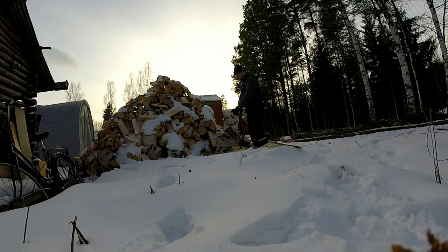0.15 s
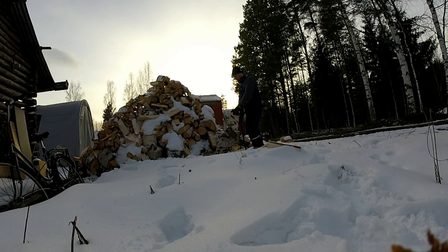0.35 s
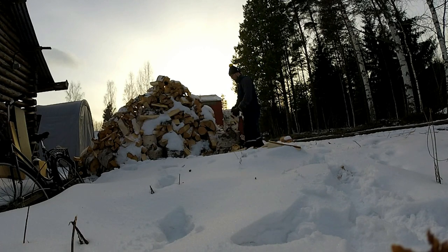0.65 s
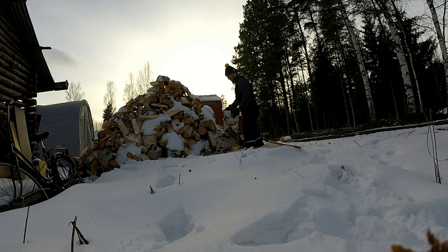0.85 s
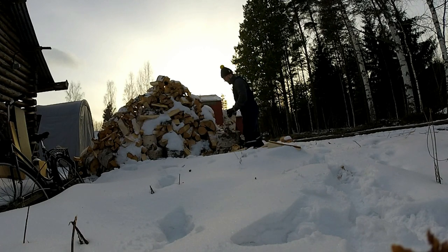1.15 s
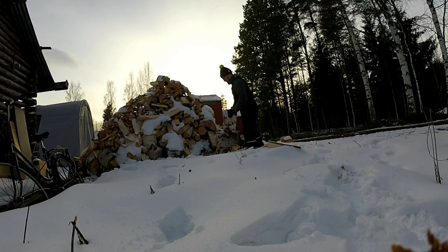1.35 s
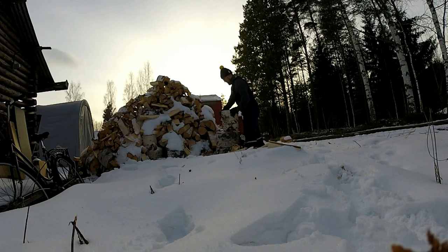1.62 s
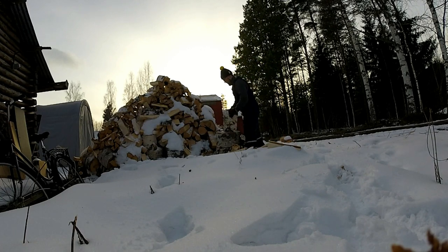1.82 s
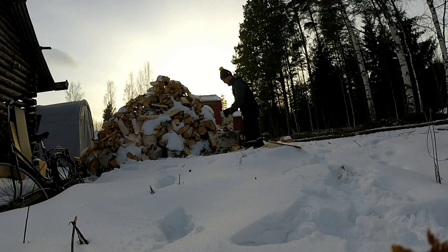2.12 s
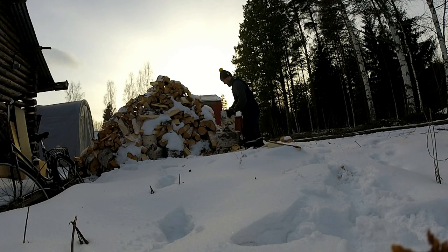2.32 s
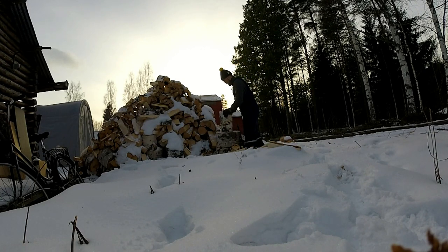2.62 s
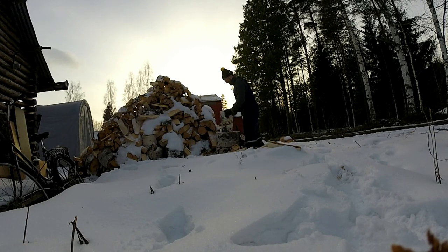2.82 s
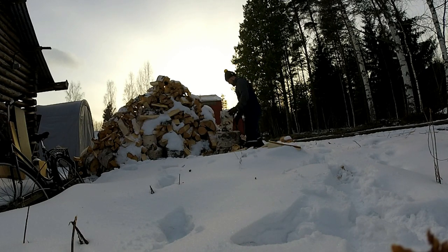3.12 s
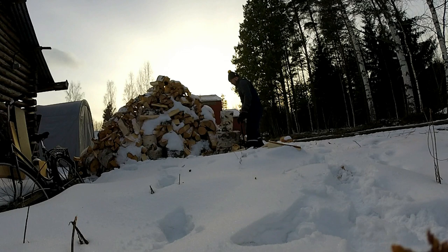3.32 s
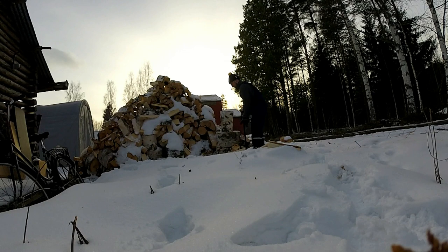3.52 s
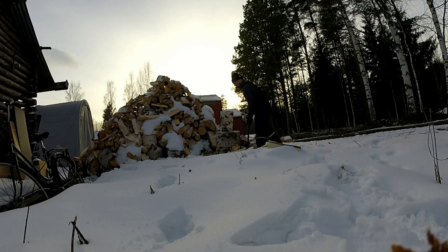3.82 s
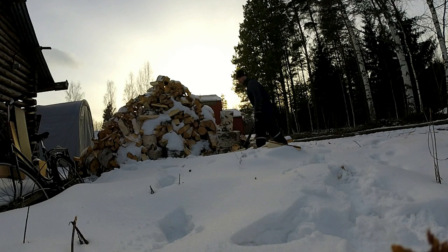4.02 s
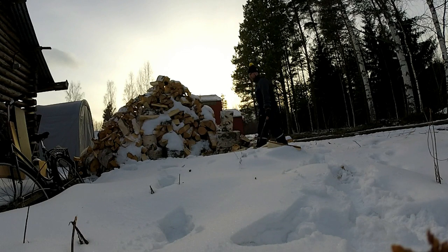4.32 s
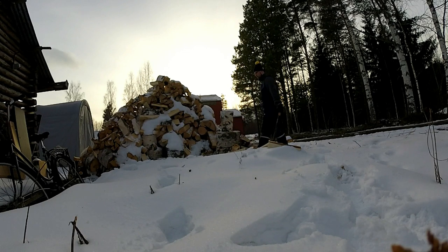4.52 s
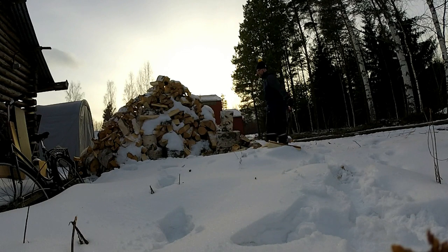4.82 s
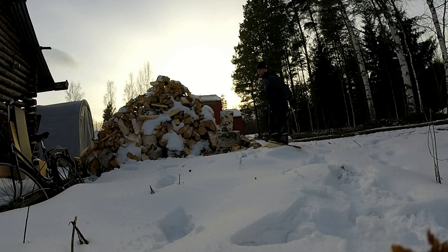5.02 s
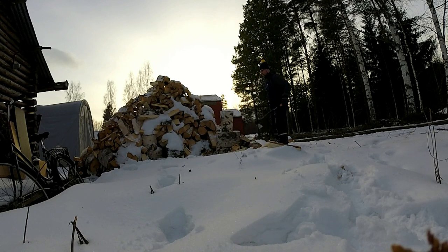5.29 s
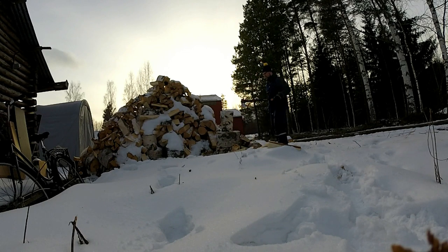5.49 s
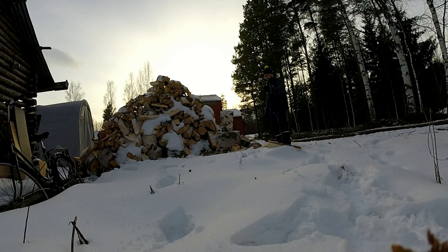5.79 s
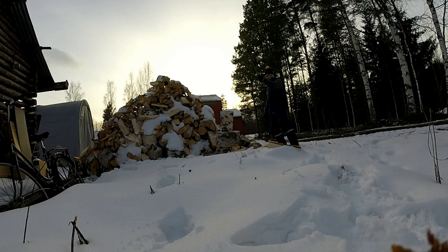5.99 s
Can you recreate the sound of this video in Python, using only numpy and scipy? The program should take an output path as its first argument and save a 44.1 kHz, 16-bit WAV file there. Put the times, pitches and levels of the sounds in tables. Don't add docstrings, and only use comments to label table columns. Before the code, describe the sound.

Outdoors in a quiet snowy yard, soft boot thuds and thin high bird whistles come first. Around 1.6 seconds an axe blow cracks a log sharply, with a brief tearing of grain, then a heavy low thud as wood lands. Smaller thumps and snow crunches follow. A nearby bird alternates clear whistles and buzzing notes, then distant trills and pips end it. A small microphone near the snow adds low hiss.

```python
import sys
import numpy as np
from scipy import signal
from scipy.fft import rfft, irfft
from scipy.io import wavfile
from scipy.ndimage import uniform_filter1d

SR = 44100
rng = np.random.default_rng(int(sys.argv[2]) if len(sys.argv) > 2 else 0)


def boost(x):
    u = np.asarray(x, float) / 20
    return 10 ** u


def transcribe(u):
    v = np.clip(np.atleast_2d(u).T, -1, 1)
    q = np.round(v * 32767).astype(np.int16)
    wavfile.write(sys.argv[1], SR, q)


N = 271215

# start_s, peak_db, pitch_hz, t60_s
SNAPS = [(1.6061, -28, 4990, 0.0113), (1.606, -23.5, 5530, 0.014), (1.606, -22.5, 3480, 0.017),
         (1.6065, -24, 2862, .018), (1.6072, -21, 2900, 0.003), (1.6081, -30, 2310, 0.0057),
         (1.606, -31, 7830, 0.0088), (1.6062, -33, 6890, 0.013), (1.6059, -33, 6130, .014),
         (1.6173, -27, 2600, 0.0052), (1.6225, -32, 3100, .005), (1.6592, -48, 2150, .015),
         (1.5786, -49, 1800, .012), (1.5789, -53, 900, .02)]
# pitch_hz, level_db, t60_s
LOG_MODES = [(134.3, -43.5, 0.13), (432, -25.5, 0.036), (1062, -23.5, 0.02), (510, -33, 0.025),
             (1350, -43, 0.017), (1629, -37, 0.035), (2075, -31, 0.05), (2413, -43, .05),
             (2600, -36, 0.045), (3500, -36.5, 0.028), (3795, -40, .03), (5270, -45.5, .04),
             (6218, -48, .05)]
BLOW_S, LOG_RISE_TURNS = 1.607, 0.6
# peak_s, level_db, swell_s, fade_s
TEARS = [
    (1.6062, -29, .0003, 0.0092),
    (1.6205, -38.5, 0.012, 0.006),
    (1.628, -50.5, .003, 0.017),
    (1.661, -60, .002, 0.022),
    (1.685, -58.5, 0.032, 0.017),
]
# freq_hz, level_db
TEAR_COLOUR = [(420, -6), (680, -24), (1700, -6), (3000, -7), (4600, -8.5), (6300, -9), (10000, -20),
               (15500, -46)]
# start_s, length_s, level_db, first_hz, last_hz
SQUEAKS = [
    (1.6156, 0.0086, -35, 2500, 3370),
    (1.617, .006, -47, 6120, 6250),
]

# start_s, peak_db, first_hz, t60_s
STAMPS = [(.226, -47.5, 58.1, 0.078), (0.437, -31.5, 71.4, 0.134), (.71, -51.5, 57.7, 0.16),
          (.83, -53.5, 50, 0.16), (1.28, -55.5, 72, 0.17), (1.42, -43.5, 74.6, 0.122),
          (1.833, -24.5, 62.4, 0.06), (1.865, -37.5, 100, 0.28), (2.019, -36.5, 66.7, 0.303),
          (2.88, -43, 91, 0.062), (4.529, -45, 62, 0.16), (4.716, -52.5, 57, .15), (4.778, -49, 55.7, 0.11),
          (5.101, -48, 49.8, 0.32)]
STAMP_SAG, STAMP_RISE_TURNS = 0.76, 0.715
# start_s, peak_db,
# first_hz, last_hz, t60_s
DROPS = [(.429, -40.5, 274.6, 155.4, 0.043), (0.4314, -42, 115, 90, 0.084), (.703, -50, 280, 248, 0.041),
         (1.58, -46, 117.4, 104.5, 0.21), (1.815, -18, 140.2, 74.6, 0.11), (1.816, -32.5, 247, 192, 0.072),
         (1.876, -59, 1120, 1110, .05), (1.966, -55, 1190, 1150, .03), (2.083, -62, 1170, 1150, .04),
         (1.619, -45, 1090, 1050, .05), (1.617, -44, 350, 310, .04), (1.63, -51, 450, 420, .08),
         (1.4547, -53, 1080, 1120, .05), (1.579, -57, 1070, 1060, .06), (2.022, -53, 600, 620, .04),
         (1.8152, -41.5, 515, 400, 0.062), (1.8155, -45, 760, 660, 0.027), (1.8146, -47, 610, 540, 0.022),
         (1.961, -50, 139.8, 107.4, 0.61), (2.012, -49.5, 420, 450, 0.05), (2.292, -41, 117, 94.6, 0.21),
         (2.35, -38.5, 155, 60, 0.168), (2.549, -39, 98, 53.8, 0.206), (2.97, -49.5, 111.5, 54.7, 0.302),
         (3.986, -43, 128, 107, 0.1), (3.987, -45.5, 231, 204, 0.045), (3.987, -53.5, 406, 360, 0.0354),
         (3.9865, -55, 540, 480, .03), (5.749, -55.5, 153, 131, .1)]
DROP_RISE_TURNS = 0.605
# time_s, effort_db
EFFORT = [(0, -5), (.22, -3), (.38, 2), (.79, -4), (1.2, 2.5), (1.45, 7.5), (1.85, -4.5), (1.99, 16),
          (2.13, 3.5), (2.5, 7), (2.64, 3.5), (3.49, -6.5), (4.04, -3), (4.73, -1), (5.0, -3), (5.31, -14),
          (5.65, -5), (6.15, -13.5)]
DEEP_DB, UPPER_DB = -65.5, -69.5
DEEP_FOLLOWS, UPPER_FOLLOWS = 1.15, 0.77

# peak_s, level_db, swell_s, fade_s, dullness_0_to_1
CRUNCHES = [(.254, -78, 0.19, 0.12, .55), (.424, -80, 0.011, .05, 0.7), (.792, -87, 0.28, 0.085, 0.64),
            (.985, -77, 0.02, 0.032, 0.55), (1.02, -79, 0.042, 0.023, 0.33), (1.2, -79, 0.49, 0.7, 0.83),
            (1.465, -78, 0.048, 0.072, 0.44), (1.585, -73, 0.019, 0.0235, 0.7),
            (1.83, -74, 0.085, 0.18, 0.77), (2.0, -76.5, 0.23, 0.14, 0.68), (2.075, -76, 0.079, .06, 0.52),
            (2.292, -72, 0.04, 0.04, 0.55), (2.345, -69.5, 0.04, 0.05, 0.6), (2.548, -75, .035, .04, .5),
            (2.572, -71.5, 0.05, 0.045, 0.55), (2.68, -86.5, 0.11, .1, .55),
            (6.088, -74, 0.021, 0.053, .55)]
# freq_hz, level_db
CRUNCH_DULL = [(300, 5.5), (1200, 1), (3000, -1), (6000, -15), (10000, -29), (15000, -38)]
# freq_hz, level_db
CRUNCH_BRIGHT = [(300, -5), (1200, -10), (3000, -7), (6000, -0.5), (10000, -12), (15000, -16)]
EDGE_DB = -18
# start_s, peak_db, low_hz, high_hz, t60_s
CRACKLES = [(0.425, -54, 240, 1200, 0.068), (0.793, -56, 800, 3100, 0.046), (1.0765, -61, 620, 1500, 0.19),
            (1.415, -57, 1000, 3450, 0.14), (1.432, -54, 1050, 3300, 0.13), (1.445, -52.5, 950, 3500, 0.14),
            (1.4546, -52, 950, 3500, 0.114), (1.466, -53, 950, 3400, 0.047),
            (1.5783, -51, 700, 2600, 0.072), (1.8, -56, 1900, 2600, .02), (1.8155, -50.5, 400, 800, 0.09),
            (1.8165, -48, 1900, 8500, 0.0173), (2.012, -52, 350, 900, 0.12),
            (2.2238, -50, 1205, 3024, 0.037), (2.2817, -62, 1500, 8800, .014), (2.5, -62, 900, 1500, 0.035),
            (2.678, -58, 4500, 14000, 0.013), (2.8958, -50, 690, 2600, 0.039),
            (3.986, -53, 310, 564.8, 0.042), (6.0255, -58, 7000, 12000, .014)]

# time_s, pitch_hz, level_db
CLEAR_NOTES = [
    [(1.755, 3830, -80), (1.771, 3780, -66.5), (1.819, 3857, -54), (1.853, 3850, -58.5), (1.863, 3868, -65),
     (1.887, 3882, -57.5), (1.939, 3890, -67), (1.947, 3747, -77), (1.96, 3855, -73)],
    [(2.425, 3830, -86), (2.439, 3720, -58), (2.471, 3753, -52.5), (2.523, 3768, -55), (2.531, 3780, -65),
     (2.571, 3785, -58), (2.591, 3814, -68), (2.629, 3750, -68), (2.7, 3790, -77)],
    [(3.04, 3741, -80), (3.05, 3830, -68), (3.086, 3752, -59), (3.106, 3804, -74.5), (3.116, 3786, -60),
     (3.126, 3821, -68), (3.164, 3819, -57.5), (3.212, 3830, -58), (3.3, 3821, -78)],
    [(3.697, 3685, -83), (3.705, 3710, -67), (3.731, 3740, -53.5), (3.765, 3742, -50), (3.829, 3792, -67.5),
     (3.859, 3810, -58), (3.909, 3810, -75), (3.917, 3783, -70), (3.955, 3720, -78)],
    [(4.395, 3790, -85), (4.409, 3752, -63), (4.421, 3753, -54), (4.475, 3752, -51.5), (4.529, 3720, -54.5),
     (4.55, 3790, -66), (4.601, 3766, -69), (4.64, 3720, -72), (4.72, 3750, -76)],
]
CLEAR_FLUTTER_DB = 1.2
# time_s, centre_hz, level_db, low_lean_0_to_1
BUZZ_NOTES = [
    [(2.074, 4600, -68, .1), (2.085, 4870, -59, .2), (2.11, 4860, -55, .2), (2.14, 4800, -62, .2),
     (2.17, 4760, -55.5, .2), (2.2, 4740, -58, .2), (2.22, 4670, -58.5, .3), (2.256, 4670, -70, 0.4)],
    [(2.717, 4600, -66.5, .1), (2.735, 4830, -58.5, .1), (2.785, 4770, -56.5, .1), (2.805, 4630, -61, .9),
     (2.835, 4620, -59.5, 1), (2.875, 4660, -62, 0.47), (2.905, 4700, -63, 0.27), (2.945, 4660, -68, .3)],
    [(3.351, 4170, -63, .6), (3.358, 4500, -57, .6), (3.366, 4730, -58.5, .6), (3.43, 4775, -60.5, 0.5),
     (3.46, 4671, -59.5, 0.5), (3.51, 4751, -60.5, .4), (3.545, 4670, -68, .4)],
    [(4.06, 3920, -66, .1), (4.067, 4770, -59, .1), (4.075, 4937, -54, .1), (4.09, 4889, -56.5, 0),
     (4.12, 4880, -55, 0), (4.135, 4820, -58, .1), (4.175, 4730, -58.5, 0.35), (4.2, 4900, -61, .3),
     (4.246, 4860, -69, .3)],
    [(4.726, 4330, -62.5, .1), (4.733, 4930, -58, .1), (4.742, 5058, -53, 0), (4.77, 4940, -54, 0),
     (4.81, 5040, -60, .1), (4.85, 4930, -58.5, 0.14), (4.875, 4850, -64, .2), (4.9, 4830, -64, .1)],
]
BUZZ_HZ, SWING_HZ = 237.6, 218
BUZZ_ROUGH = 0.038
SWING_IN_S = 0.0081

# start_s, length_s, level_db, first_hz, last_hz
SLIDES = [
    (0.446, .097, -68.5, 7100, 6766),
    (4.21, .027, -78, 7100, 6720),
    (4.37, .083, -73, 7150, 6900),
    (4.526, .1, -71, 7100, 6300),
    (5.221, 0.107, -71, 7200, 6404),
]
HOOKS = [
    (4.705, 0.028, -73, 6760, 6400),
    (5.415, .08, -78.5, 7850, 7550),
    (5.578, .112, -76, 7770, 7050),
    (5.778, 0.078, -77, 7250, 6690),
]
PLUNGES = [
    (.611, .107, -69, 7010, 6240),
]
FALLS = [
    (.806, .05, -74, 6700, 6160),
    (5.416, 0.051, -74, 6900, 6500),
    (5.4161, .05, -82, 13800, 13000),
]
ARCHES = [
    (.9615, .078, -76, 5554, 5670),
    (5.045, .082, -70.5, 6900, 7030),
    (5.845, 0.03, -66, 8460, 8300),
]
FLICKS = [
    (6.092, 0.036, -63, 6970, 7370),
    (6.103, .028, -62.5, 7150, 7250),
]
STREAKS = [
    (6.082, 0.018, -64, 6700, 9300),
    (6.096, .014, -74, 9000, 13000),
    (6.088, .014, -73, 5800, 8200),
    (6.082, .01, -72.5, 7500, 10500),
]

# start_s, length_s, level_db, first_hz, last_hz
FLUTE = [(2.428, 0.074, -68, 2290, 2160), (2.49, 0.09, -70, 2130, 2128), (2.63, .062, -72, 2105, 2125),
         (2.73, 0.042, -68, 2240, 1970), (2.76, 0.062, -62, 1975, 1880), (2.815, .022, -68, 1900, 1970),
         (2.86, .05, -74, 2050, 2250), (3.21, .05, -73, 2190, 2270), (3.73, .07, -74, 2090, 2160),
         (3.235, .055, -76, 2810, 2800), (3.07, .03, -74, 2740, 2755), (3.129, 0.057, -66, 2770, 2840),
         (3.256, 0.04, -72, 2540, 2560), (3.296, 0.088, -69, 2660, 2670), (3.38, .06, -77, 2650, 2620),
         (3.475, .065, -75, 2010, 2130), (3.492, .13, -79.5, 3650, 3610), (3.545, .045, -65, 2060, 2050),
         (3.583, 0.06, -69, 2110, 2200), (5.215, .1, -79, 3500, 3500), (5.81, 0.079, -79, 3500, 3530)]
TRILLS = [
    (5.058, 0.058, -71.5, 4800, 5000),
    (5.163, 0.066, -71, 4600, 4900),
    (5.282, .06, -72, 4800, 4800),
    (5.396, 0.0633, -72, 4800, 4690),
]
STRANDS = [
    (5.062, .055, -77, 4800, 5200),
    (5.158, .034, -73, 4380, 5120),
    (5.195, .035, -73, 5130, 5150),
    (5.172, .04, -72, 4820, 4580),
    (5.205, .028, -75, 4600, 4800),
    (5.29, .045, -77, 5100, 5150),
    (5.285, .03, -76, 4950, 4950),
    (5.31, .063, -74, 4970, 4580),
    (5.396, .02, -77, 4600, 5150),
    (5.414, .07, -79, 5170, 5120),
]
PIPS = [(5.457, 0.022, -68, 4960, 4870), (5.478, .028, -68.5, 4880, 4930), (5.59, .014, -70, 4950, 4900),
        (5.612, 0.022, -71, 4920, 4800), (5.72, 0.0186, -71, 4970, 4880),
        (5.746, 0.0224, -69.5, 4920, 4900), (5.853, .018, -70, 4960, 4890), (5.874, 0.032, -71, 4920, 4870),
        (5.96, .012, -74.5, 4850, 4830), (6.0, .016, -74, 5000, 4850), (6.02, 0.014, -70, 4850, 5200),
        (6.028, .026, -71, 5180, 4750)]

# freq_hz, level_db_per_hz
AIR_COLOUR = [(27, -4), (45, 0), (233, -5), (846, -11), (4760, -22.5), (12400, -36), (14300, -35.5),
              (15500, -48)]
AIR_DB = -60


def split():
    out, t = np.zeros(N), np.arange(SR // 5) / SR
    for s, db, hz, t60 in SNAPS:
        grit = uniform_filter1d(rng.standard_normal(len(t)), size=2)
        add(out, s, boost(db - 60 * t / t60) * (np.sin(2 * np.pi * hz * t) + 0.104 * grit))
    for hz, db, t60 in LOG_MODES:
        attack = 1 - np.exp(-t * hz / LOG_RISE_TURNS)
        add(out, BLOW_S, boost(db - 60 * t / t60) * attack * np.sin(2 * np.pi * hz * t))
    for row in SQUEAKS:
        add(out, *whistle(*row, edge_s=0.00118, flutter_db=2.0))
    fibres = grains(N, per_s=9000, spread_db=0.0)
    resonant = woody(np.diff(fibres, prepend=0))
    out += sum(humps(TEARS)) * (coloured(fibres, TEAR_COLOUR) + boost(-5.5) * resonant)
    return woods(out, t60=0.34, wet_db=-21.0)


def woody(clicks):
    t = np.arange(SR // 20) / SR
    rings = np.zeros(len(t))
    for hz, db, t60 in LOG_MODES[2:]:
        rings += boost(db - 60 * t / (0.5 * t60)) * np.sin(2 * np.pi * hz * t)
    return evened(signal.fftconvolve(clicks, rings)[:len(clicks)])


def ground():
    t = np.arange(N) / SR
    effort_db = np.interp(t, *np.transpose(EFFORT))
    lumps = boost(4.1 * wander(N, 0.027))
    deep_colour = [(22, -4), (40, 13.5), (65, -1.5), (100, -4), (150, -49.0)]
    upper_colour = [(70, -16), (100, 4), (150, -5.5), (230, -11), (350, -41.5)]
    deep = coloured(rng.standard_normal(N), deep_colour) * boost(DEEP_DB + DEEP_FOLLOWS * effort_db)
    upper = coloured(rng.standard_normal(N), upper_colour) * boost(UPPER_DB + UPPER_FOLLOWS * effort_db)
    shocks = np.zeros(N)
    for s, db, hz, t60 in STAMPS:
        add(shocks, s, shock(db, hz, STAMP_SAG * hz, STAMP_RISE_TURNS / hz, t60))
    for s, db, hz, last_hz, t60 in DROPS:
        add(shocks, s, shock(db, hz, last_hz, DROP_RISE_TURNS / hz, t60))
    return lumps * (deep + upper) + woods(shocks, t60=0.21, wet_db=-9.0)


def shock(db, first_hz, last_hz, rise_s, t60):
    t = np.arange(SR // 2) / SR
    hz = last_hz + (first_hz - last_hz) * np.exp(-(t / (0.18 * t60)) ** 2)
    swell = (1 - np.exp(-t / rise_s)) ** 2 * boost(-60 * (t / t60) ** 1.43)
    return -boost(db) * swell / swell.max() * np.cos(2 * np.pi * np.cumsum(hz) / SR)


def crunch():
    motions = np.array(humps(CRUNCHES))
    dullness = np.clip([row[-1] for row in CRUNCHES], 0, 1)
    clicks = grains(N, per_s=3500, spread_db=3.5)
    bright = boost(14.0) * ((1 - dullness) @ motions) * coloured(clicks, CRUNCH_BRIGHT)
    dull = boost(16.5) * (dullness @ motions) * coloured(clicks, CRUNCH_DULL)
    return boost(1.8 * wander(N, 0.015)) * (bright + dull)


def crackles():
    out, t = np.zeros(N), np.arange(SR // 6) / SR
    for s, db, low_hz, high_hz, t60 in CRACKLES:
        band = signal.butter(2, [low_hz, high_hz], "bandpass", fs=SR, output="sos")
        clicks = grains(len(t), per_s=6000, spread_db=3.5)
        burst = signal.sosfilt(band, evened(clicks) + boost(-13.0) * woody(clicks))
        add(out, s, boost(db - 60 * t / t60) * (1 - np.exp(-t / 0.0009)) * evened(burst))
    return out


def near_bird():
    clear, buzzing = np.zeros((2, N))
    for rows in CLEAR_NOTES:
        t, hz, db = along(rows)
        tone = np.sin(2 * np.pi * np.cumsum(hz) / SR) * signal.windows.tukey(len(t), 0.08)
        add(clear, t[0], np.sqrt(2) * boost(db + CLEAR_FLUTTER_DB * wander(len(t), 0.00464)) * tone)
    for rows in BUZZ_NOTES:
        t, hz, db, lean = along(rows)
        add(buzzing, *buzz(t, db, hz, lean, SWING_HZ, BUZZ_HZ, rough=BUZZ_ROUGH))
    return woods(clear, t60=0.33, wet_db=-11.5) + woods(buzzing, t60=0.42, wet_db=-7)


def small_bird():
    high = np.zeros(N)
    for row in PLUNGES:
        add(high, *whistle(*row, tilt_db=10, lead=(0.03, 0.012), hook=(-0.42, 0.0018),
                           octave_db=-30, edge_s=0.0012))
    for row in FALLS:
        add(high, *whistle(*row, tilt_db=4, hook=(-0.29, 0.016), edge_s=0.003))
    for row in STREAKS:
        add(high, *whistle(*row, edge_s=0.003, flutter_db=-1.17))
    for row in SLIDES:
        add(high, *whistle(*row, tilt_db=5, lead=(0.075, 0.012), hook=(-0.03, 0.004),
                           octave_db=-12, edge_s=0.0052))
    for row in HOOKS:
        add(high, *whistle(*row, tilt_db=8, lead=(0.015, 0.012), hook=(-0.16, 0.005),
                           octave_db=-14, edge_s=0.0031))
    for row in ARCHES:
        add(high, *whistle(*row, tilt_db=-2, lead=(-0.26, 0.004), hook=(-0.13, 0.011),
                           octave_db=-20, edge_s=0.0025))
    for row in FLICKS:
        add(high, *whistle(*row, tilt_db=5, lead=(-0.3, 0.008), edge_s=0.002, flutter_db=3.0))
    return woods(high, t60=0.16, wet_db=-9.5)


def far_birds():
    far = np.zeros(N)
    for row in FLUTE:
        add(far, *whistle(*row, edge_s=0.011, flutter_db=1.8))
    for s, length, db, hz, last_hz in TRILLS:
        t = np.arange(int(length * SR)) / SR
        glide_hz = hz + (last_hz - hz) * t / length
        add(far, *buzz(s + t, db, glide_hz, lean=0.1, swing_hz=330, rate_hz=149.4, rough=0.08))
    for row in STRANDS:
        add(far, *whistle(*row, edge_s=0.005, flutter_db=2.2))
    for row in PIPS:
        add(far, *whistle(*row, hook=(-0.035, 0.003), edge_s=0.003, flutter_db=1.5))
    return woods(far, t60=0.45, wet_db=-9)


def whistle(s, length, db, first_hz, last_hz, tilt_db=0., lead=(0, 1), hook=(0, 1), octave_db=-60,
            edge_s=0.0097, flutter_db=2.5):
    t = np.arange(0, length, 1 / SR)
    bend = 1 + lead[0] * np.exp(-t / lead[1]) + hook[0] * np.exp((t - length) / hook[1])
    hz = (first_hz + (last_hz - first_hz) * t / length) * bend
    turn = 2 * np.pi * np.cumsum(hz) / SR
    tone = np.sin(turn) + boost(octave_db - 12 * t / length) * np.sin(2 * turn)
    soft = np.minimum(np.minimum(t, length - t) / edge_s, 1) ** 2
    level_db = db + tilt_db * (t / length - 0.5) + flutter_db * wander(len(t), 0.0068)
    return s, np.sqrt(2) * tone * soft * boost(level_db)


def buzz(t, db, hz, lean, swing_hz, rate_hz, rough):
    beat = 2 * np.pi * np.cumsum(rate_hz * (1 + rough * wander(len(t), 0.0067))) / SR
    depth = 1 - np.exp(-((t - t[0]) / SWING_IN_S) ** 2)
    sweep = np.sin(beat) + 0.29 * np.cos(2 * beat)
    pitch = hz * (1 + 0.1 * rough * wander(len(t), 0.0099)) + depth * swing_hz * sweep
    throb = 1 + depth * (0.27 * np.cos(beat) - lean * np.sin(beat))
    tone = evened(np.sin(2 * np.pi * np.cumsum(pitch) / SR) * throb)
    return t[0], boost(db + 2.04 * wander(len(t), 0.0032)) * tone * signal.windows.tukey(len(t), 0.04)


def along(rows):
    s, *columns = np.transpose(rows)
    t = np.arange(s[0], s[-1], 1 / SR)
    return t, *[np.interp(t, s, column) for column in columns]


def air():
    return boost(AIR_DB + 0.41 * wander(N, 0.045)) * coloured(rng.standard_normal(N), AIR_COLOUR)


def woods(x, t60, wet_db):
    t = np.arange(int(0.5 * SR)) / SR
    sparse = rng.standard_normal(len(t)) * (rng.random(len(t)) < 0.06)
    taps = sparse * boost(-60 * t / t60) * (t > 0.006)
    return x + boost(wet_db) * signal.fftconvolve(x, taps / np.linalg.norm(taps))[:N]


def grains(size, per_s, spread_db):
    sizes = boost(spread_db * np.minimum(rng.exponential(1, size), 4)) * rng.choice([-1, 1], size)
    return sizes * (rng.random(size) < per_s / SR)


def humps(rows):
    t = np.arange(N) / SR
    return [boost(db + EDGE_DB * np.maximum((s - t) / swell, (t - s) / fade)) for s, db, swell, fade, *_ in rows]


def wander(size, smooth_s):
    width = max(int(smooth_s * SR), 2)
    smooth = uniform_filter1d(rng.standard_normal(size), width)
    return evened(uniform_filter1d(smooth, width))


def coloured(x, points):
    f, db = np.transpose(points)
    hz = np.fft.rfftfreq(len(x), 1 / SR)
    gain_db = np.interp(np.log(hz + 1), np.log(f + 1), db, left=-80)
    return evened(irfft(rfft(x) * boost(gain_db), len(x)))


def evened(x):
    return x / np.sqrt(np.mean(x ** 2) + 1e-20)


def add(mix, s, sound):
    part = mix[round(s * SR):][:len(sound)]
    part += sound[:len(part)]


def scene():
    work = split() + ground() + crunch() + crackles()
    birds = near_bird() + small_bird() + far_birds()
    return (work + birds + air())[None]


def low_pass(x):
    return signal.sosfilt(signal.butter(12, 16050, fs=SR, output="sos"), x)


def record(dry):
    hz, _, z = signal.stft(dry, SR, nperseg=2048)
    hz = hz[:1024]
    bands = (abs(z[:, :1024]) ** 2).reshape(1, 128, 8, -1).mean(axis=2)
    power_db = 10 * np.log10(np.repeat(bands, 8, axis=1) + 1e-20)
    usual_db = np.median(power_db, axis=2, keepdims=True)
    treble_db = (power_db - usual_db)[:, 500:690].mean(axis=1, keepdims=True)
    usual_db = usual_db + 0.8 * treble_db * (hz[:, None] < 15100)
    margin_db = np.interp(hz, [12500, 12800, 14800, 15100, 15200, 15290, 16400],
                          [-9, -1.5, -0.8, 2, 7, 24, 60])
    z[:, :1024] *= (power_db > usual_db + margin_db[:, None]) | (hz[:, None] < 12500)
    mix = signal.istft(z, SR, nperseg=2048)[1][:, :N]
    return low_pass(mix)


dry = scene()
out = record(dry)
transcribe(out)
```